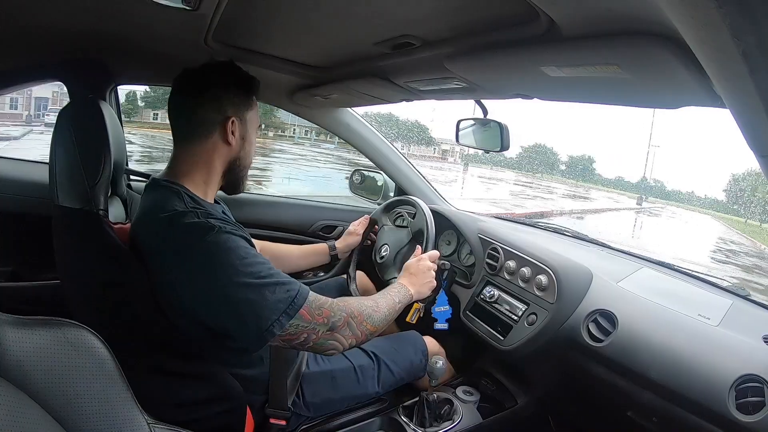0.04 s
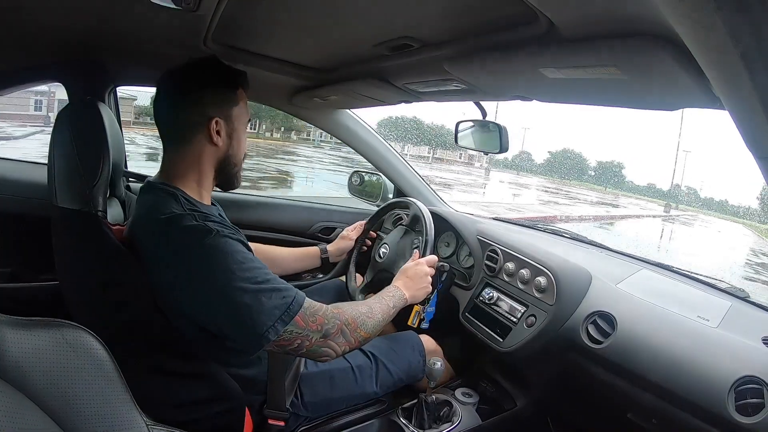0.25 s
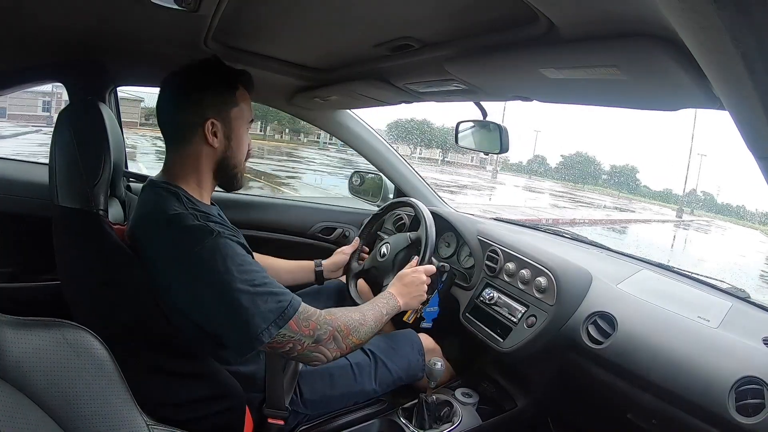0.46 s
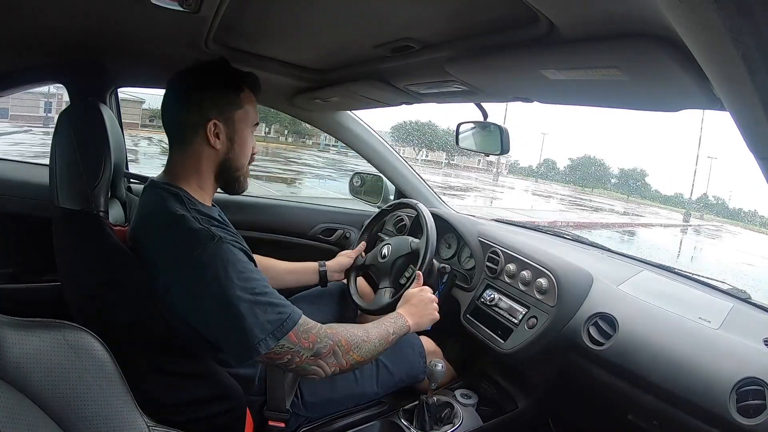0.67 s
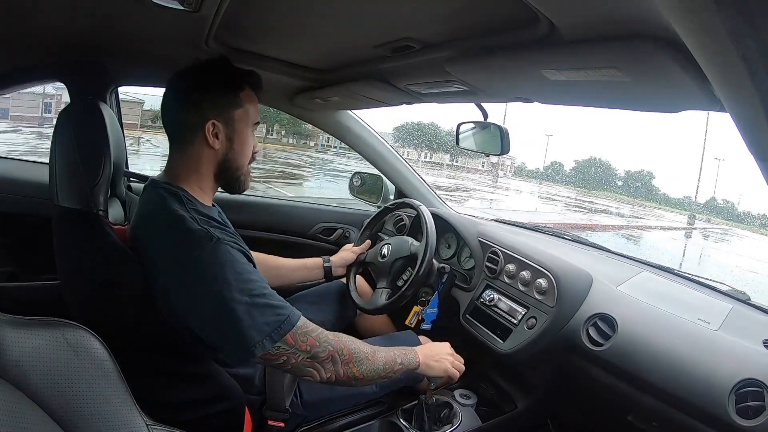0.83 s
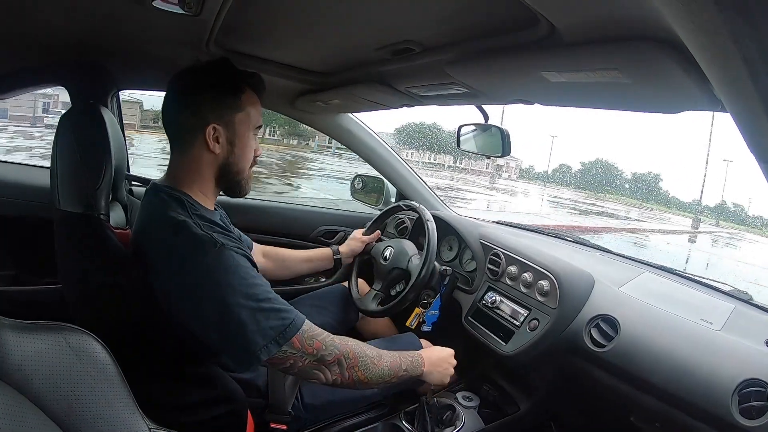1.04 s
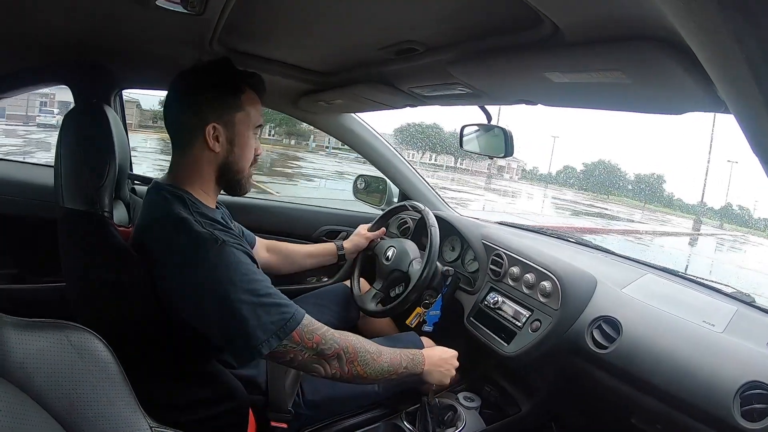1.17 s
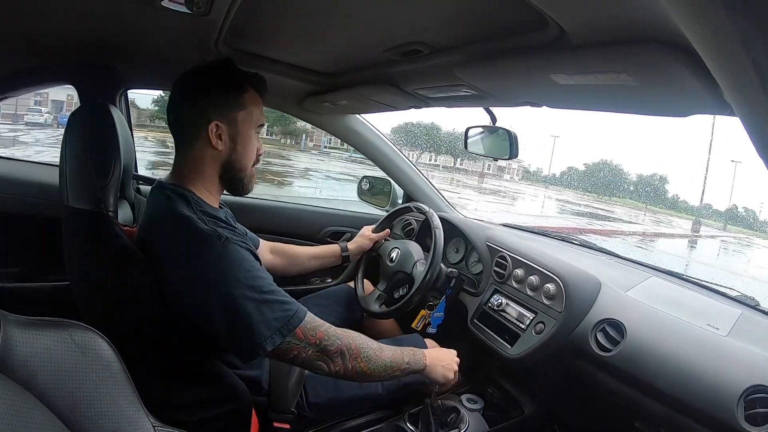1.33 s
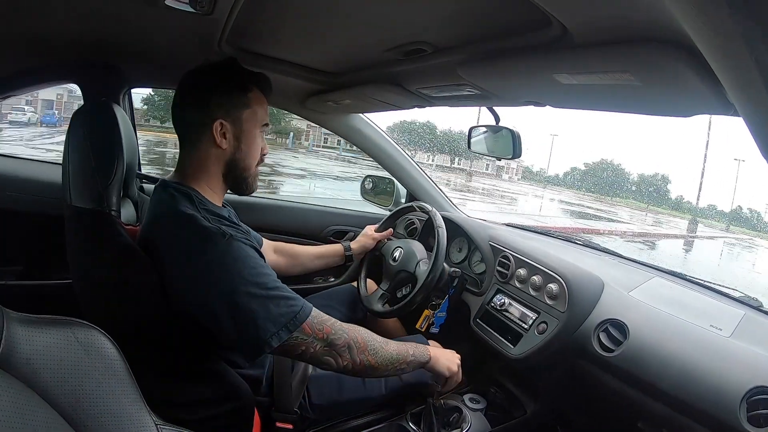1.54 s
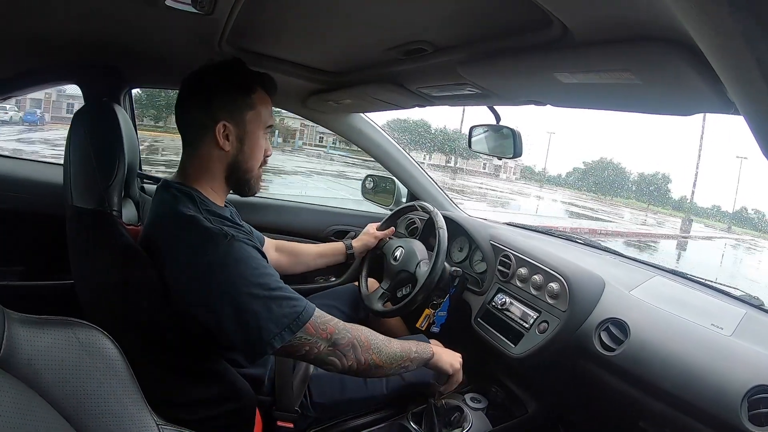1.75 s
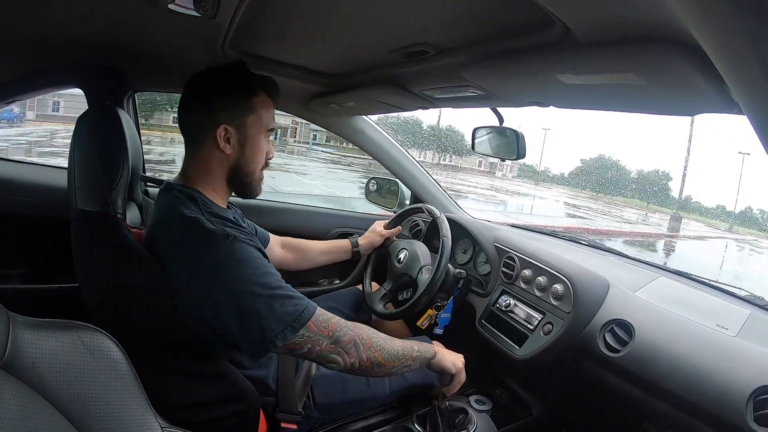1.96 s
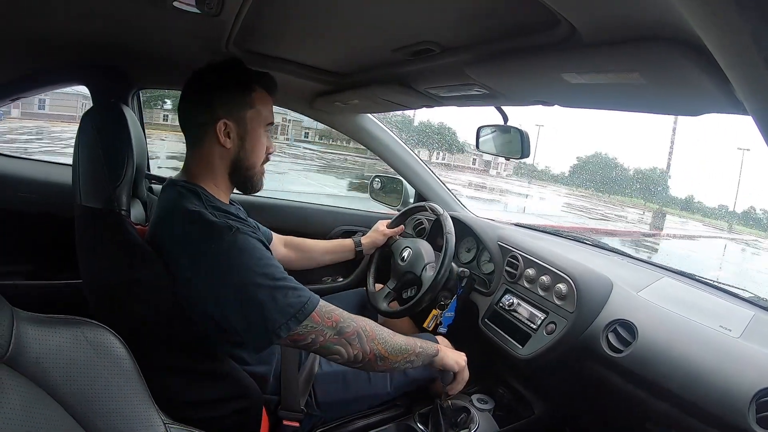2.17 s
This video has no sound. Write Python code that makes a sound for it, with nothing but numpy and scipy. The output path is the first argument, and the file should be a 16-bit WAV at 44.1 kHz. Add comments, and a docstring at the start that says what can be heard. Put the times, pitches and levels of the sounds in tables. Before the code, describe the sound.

Car engine accelerating from a low drone to a loud, raspy howl inside a rumbling cabin.

```python
"""A wide low thud under the slightly fainter car opens the scene and ends at once in the click of an edit.
Then a car pulls hard in a low gear on a wet road, heard from beside the passenger seat. Sine waves at the
firing rate and shaft multiples of its four-cylinder engine sweep through the peaks and holes of the cabin;
the valve timing changes on the way up and the throttle eases at the end. Filtered noise makes road rumble,
cabin drone, engine clatter, spray in the wheel arches and a few ticks."""
import sys
import numpy as np
from scipy import signal
from scipy.fft import rfft, irfft
from scipy.io import wavfile
from scipy.ndimage import uniform_filter1d

SR = 44100
rng = np.random.default_rng(int(sys.argv[2]) if len(sys.argv) > 2 else 0)


def materialize(psi):
    """Save the field psi as 16-bit PCM at rate SR to the path in sys.argv[1].

    A 1-D psi becomes a single channel; in a 2-D psi each row is a channel.
    """
    bounded = np.clip(np.atleast_2d(psi).T, -1, 1)
    quanta = np.round(bounded * 32767).astype(np.int16)
    wavfile.write(sys.argv[1], SR, quanta)


def amplitude_ratio(level_db):
    """Convert a level in decibels to the matching linear amplitude (field) ratio."""
    exponent = np.asarray(level_db, float) / 20
    return 10 ** exponent


N = 97108  # samples

# Engine speed. Each row: time in seconds, firings per second in Hz.
FIRING_RATE = [(0.0, 108.0), (0.14, 113.9), (0.28, 118.4), (0.42, 126.3), (0.56, 134.6), (0.7, 143.9),
               (0.84, 152), (0.98, 162.8), (1.12, 172.5), (1.26, 183.8), (1.4, 192), (1.54, 205.3),
               (1.68, 216.3), (1.82, 230.7), (1.96, 241.1), (2.1, 251.6), (2.2, 255.2)]
# Firing tone through exhaust and cabin. Each row: firing rate in Hz, mid rms in dB, side rms in dB.
FIRING_RESPONSE = [(110.6, -18, -47), (114, -19, -48), (117, -21, -52), (121, -22, -55), (124.3, -25, -50),
                   (127.6, -19, -47), (130.9, -15, -48), (135.5, -14, -54), (140.7, -17, -43),
                   (142.6, -23, -39), (145.8, -15, -35), (149.5, -12, -34), (160.6, -11, -36),
                   (168, -13, -33), (170.9, -20, -31), (173, -38, -29), (175.1, -28, -28), (178, -18, -27),
                   (182.3, -11, -29), (187.4, -9, -31), (197.6, -11, -35), (201.9, -14, -39),
                   (210.6, -18, -45), (216.6, -22, -58), (220.5, -27, -51), (224.3, -21, -52),
                   (229.4, -14, -42), (233.4, -15, -40), (236.7, -11, -33), (242.3, -11.5, -32),
                   (247.8, -15, -37), (251, -13, -32), (254.7, -16, -32), (257.6, -19, -35)]
# Other multiples of the firing rate, before the cabin response.
# Each row: multiple, level in dB with mild cam, level in dB with sharp cam.
MULTIPLES = [(0.5, -45.5, -33), (0.75, -36, -24), (1.25, -39.5, -32.5), (1.5, -45, -34.5),
             (1.75, -47.5, -40.5), (2.0, -32.5, -31), (2.25, -47.5, -42), (2.5, -45, -43.5),
             (2.75, -48.0, -42.5), (3.0, -48.5, -45), (3.25, -49.5, -48), (3.5, -52.5, -53.5),
             (3.75, -49.5, -51.5), (4.0, -50, -51), (4.25, -56.5, -50.5), (4.5, -60.5, -51.5)]
# Change of each of those multiples, in the same order, while the revs are low. Each entry: change in dB.
LOW_REV_DB = [4, 6, 2.5, 0.5, 2, -7, 4, -3.5, -1.5, 1.5, -3.5, -5, -4, -5, 2.5, -2]
# Body and cabin response for the multiples. Each row: frequency in Hz, mid gain in dB, side gain in dB.
CABIN_RESPONSE = [(60.3, -8.5, -21.5), (97, -1.5, -17), (111, -1.5, -23), (137, 4, -21.5), (166, -8.5, -39),
                  (159, 4, -23.5), (168.8, -4, -21), (181.2, 3.5, -21), (186.9, 3, -16), (192.9, -0.5, -20),
                  (238.3, -3, -24.5), (240.0, -11.5, -26), (256.8, 5.5, -17), (290, -0.5, -18.5),
                  (310.4, -0.5, -20), (327.7, 13, -11.5), (330.7, 10, -16.5), (373, 3, -8), (381, 8.5, -16),
                  (415, 4, -20), (436, -1, -10.5), (480, -4, -14), (504.6, 0.5, -12), (550.4, 7.5, -0.5),
                  (559, -2, -3.5), (670, -6.5, -6), (650, 6, -1), (660, 0.5, -5.5), (708, -1, -4),
                  (753, 0.5, 1.5), (802, -9.5, 3.5), (840, 4, 2.5), (930, 5, -0.5), (1025, -7.5, -1),
                  (1100.0, 4.5, -5), (1140, 2.5, -11.5), (1330, -7.5, -9), (1450, 0.5, 2),
                  (1580, -8.5, -9.5), (2100, -7, -6.5)]
# A multiple swells, or dips where negative, briefly around a given time.
# Each row: time in seconds, multiple of firing rate, rise in dB, time to 1/e of that rise in seconds.
MULTIPLE_SWELLS = [(0.52, 3.0, 10.5, 0.1), (0.55, 2.5, 7.5, 0.072), (0.684, 1.5, 20, 0.067),
                   (0.72, 6.0, 10, .07), (0.84, 1.25, 14.5, 0.13), (0.53, 2.0, 3, 0.097),
                   (0.84, 5.75, 8, .05), (0.88, 1.75, 13.5, 0.17), (0.86, 2.25, 8.5, 0.047),
                   (1.1, 2.75, 8.5, 0.057), (1.11, 3.0, 15, 0.042), (1.47, 2.75, 9, 0.15),
                   (1.52, 3.75, 14, 0.038), (1.56, 4.25, 5.5, 0.048), (1.555, 1.5, 12, 0.054),
                   (2.3, 3.0, 8, .13), (2.06, .75, 5.5, 0.079), (1.03, 4.0, 4.5, 0.21),
                   (1.97, 2.0, 6, 0.07), (1.65, 1.25, -7.5, 0.09), (2.11, 1.5, -15.5, 0.038),
                   (2.09, 2.0, -9, 0.038)]
# Noise spectra. Each row: frequency in Hz, relative mid density in dB per Hz, relative side density likewise.
RUMBLE_COLOUR = [(15.7, -11, -14.5), (28, 0, -15.5), (47.4, -6.5, -23.5), (71, -14.5, -23),
                 (94, -6.5, -21.5), (108, -22, -39.5)]
DRONE_COLOUR = [(80, -6, -24), (110, -1, -20), (200, -5, -24), (350, -7, -23), (520, -13, -19),
                (800, -26, -28)]
CLATTER_COLOUR = [(289, -4.5, -23.5), (610, -8, -9.5), (750, -3, -1.5), (850, -9, -8.5), (920, -4.5, -4.5),
                  (1200, -6.5, -10.5), (1400, -9.5, -8), (1520, -11.5, -14.5), (2160, -11.5, -16.5),
                  (2870, -21, -21), (3700, -24, -28), (4150, -28, -32.5), (6240, -32.5, -30),
                  (7500, -44, -44.5), (10500, -55.5, -52), (11500, -66.5, -71), (15000, -76, -79.5)]
SPRAY_COLOUR = [(2520, -8, -19.5), (4200, -6.5, -10), (4995, -0.5, -1.5), (6800, 0.5, -3), (7600, -8, -5.5),
                (10000, -9, -11.5), (11500, -24.5, -22.5), (14000, -36, -43.5)]
# Road surface under the wheels. Each row: time in seconds, rumble level in dB.
SURFACE_LEVEL = [(0.06, -32), (0.2, -28), (0.25, -33), (0.31, -23.5), (0.57, -25), (0.67, -22.5),
                 (0.83, -33), (0.91, -31), (0.96, -39), (1.01, -18), (1.1, -27.5), (1.16, -23.5),
                 (1.29, -28), (2.18, -24)]
# Treble noise. Each row: time in seconds, clatter level in dB, spray level in dB.
TREBLE_LEVEL = [(0, -45.5, -55), (.2, -46, -53), (.35, -44.5, -56.5), (.47, -41, -61.5),
                (.56, -42.5, -60.5), (.7, -42.5, -65), (.95, -43, -64.5), (1.15, -44.5, -68),
                (1.3, -43.5, -63.5), (1.5, -42.5, -71.5), (1.7, -40.5, -69.5), (1.9, -39, -65),
                (2.2, -37.5, -58)]
# Small things in the cabin. Each row: start in seconds, white-noise level in dB before band filter and envelope,
# decay time in seconds, left minus right in dB.
TICKS = [(.26, -49, .015, -9), (0.999, -35, 0.0088, -4), (1.017, -48, 0.009, -4.5), (1.377, -56, .004, -2)]

EDIT_S = .0386


def column(table, at, k):
    """Linear interpolation: column k of a table, slewed by a 20 ms moving mean so that nothing jumps."""
    rows = np.array(sorted(table), float)
    return uniform_filter1d(np.interp(at, rows[:, 0], rows[:, k]), int(.02 * SR))


def walk(rate):
    """Band-limited fluctuation: random levels held 1 / rate s and smoothed twice, rms about 0.8."""
    hold = int(SR / rate)
    steps = np.repeat(rng.standard_normal(N // 100), hold)[:N]
    return 1.1 * uniform_filter1d(uniform_filter1d(steps, hold), hold)


def fade(t, centre_s, length_s):
    """Linear transition: 0 to 1 over length_s about its centre."""
    return np.clip((t - centre_s) / length_s + .5, 0, 1)


def noise(colour, swell_db, flicker_db, rate):
    """Spectral shaping: mid and side noise, mid rms near 1, in bands that swell together and flicker alone.

    Both depths multiply walks.
    """
    rows = np.array(colour, float)
    hz = np.maximum(np.arange(N // 2 + 1) * SR / N, 1)
    log_hz, log_rows = np.log(hz), np.log(rows[:, 0])
    gain = amplitude_ratio([np.interp(log_hz, log_rows, rows[:, k], left=-99, right=-99) for k in (1, 2)])
    spectrum = rfft(rng.standard_normal((2, N))) * gain
    place = 2 * np.log2(hz / rows[0, 0])  # in half octaves
    swell, out = walk(3.7), 0
    for band in range(int(2 * np.log2(rows[-1, 0] / rows[0, 0])) + 2):
        share = np.clip(1 - abs(place - band), 0, 1)  # neighbouring bands overlap and sum to one
        out = out + irfft(spectrum * share, N) * amplitude_ratio(swell_db * swell + flicker_db * walk(rate))
    return out / np.sqrt(np.mean(gain[0] ** 2))


def panned(x, pan_db):
    """Interaural level difference: left minus right in dB, split evenly between the two."""
    return x * amplitude_ratio(np.array([[pan_db], [-pan_db]]) / 2)


def left_right(mid_side):
    """Sum and difference: left is mid plus side, right is mid minus side."""
    return np.array([[1, 1], [1, -1]]) @ mid_side


def opening_thud(t):
    """Interchannel phase difference: one low sine, out of step between left and right, sounds wide."""
    return amplitude_ratio(-20) * np.sin(2 * np.pi * 65.5 * t + np.array([[2.5], [4.0]]))


def firing_tone(hz, phase):
    """Resonance: a sine at the firing rate rises and falls with the exhaust and cabin response."""
    mid = amplitude_ratio(column(FIRING_RESPONSE, hz, 1)) * np.sin(phase)
    side = amplitude_ratio(column(FIRING_RESPONSE, hz, 2)) * np.cos(phase)
    waver = amplitude_ratio(.4 * walk(20))
    return np.sqrt(2) * waver * np.array([mid, side])  # sqrt(2): from rms to peak


def multiple_rows():
    """Harmonic roll-off: the listed multiples, then upper ones a quarter apart that fall off evenly.

    Each row: multiple, level in dB with mild cam, with sharp cam, low-rev change in dB.
    """
    rows = [(*row, low_db) for row, low_db in zip(MULTIPLES, LOW_REV_DB)]
    for above in np.arange(22) / 4:
        slope_db = -2.01 * above
        rows.append((4.75 + above, -55.5 + slope_db, -54.5 + slope_db, -5))
    return rows


def multiple_swell_db(t, multiple):
    """Gaussian envelope: a bell-shaped rise or dip in dB of one multiple around each given time."""
    return sum(rise_db * np.exp(-((t - at) / half) ** 2)
               for at, m, rise_db, half in MULTIPLE_SWELLS if abs(m - multiple) < 1 / 8)


def shaft_multiples(t, hz, phase):
    """Order series: partials locked to the shaft, each filtered by the cabin and wavering on its own."""
    sharp_cam = fade(t, 1.46, .013)  # the valve timing changes
    low_revs = 1 - fade(t, .59, .1)
    out = np.zeros((2, N))
    for multiple, mild_db, sharp_db, low_db in multiple_rows():
        turn = multiple * (phase + .075 * walk(12))  # walk scaled in radians per multiple
        level_db = mild_db + sharp_cam * (sharp_db - mild_db) + low_revs * low_db
        level_db = level_db + multiple_swell_db(t, multiple)
        waver_db = min(1.2 + .8 * multiple, 4.5)
        for k in (1, 2):  # mid, side
            # the cap on the walk lets a multiple dip far but rise little
            waver = waver_db * np.minimum(walk(14), .6)
            db = level_db + column(CABIN_RESPONSE, multiple * hz, k) + waver
            out[k - 1] += amplitude_ratio(db) * np.sin(turn + 2 * np.pi * rng.random())
    return np.sqrt(2) * out  # from rms to peak


def engine(t, hz, phase):
    """Superposition: firing tone plus multiples, which fade twice as many dB as the throttle eases."""
    lift_db = -4 * fade(t, 2.17, .055)
    return amplitude_ratio(lift_db / 2) * firing_tone(hz, phase) + amplitude_ratio(lift_db) * shaft_multiples(t, hz, phase)


def road_rumble(t):
    """Random excitation: low noise from the road whose level follows the surface under the wheels."""
    return amplitude_ratio(column(SURFACE_LEVEL, t, 1)) * noise(RUMBLE_COLOUR, .33, 2.5, 9)


def cabin_drone():
    """Diffuse background: steady low noise of the cabin with a slight flicker."""
    return amplitude_ratio(-35) * noise(DRONE_COLOUR, .06, 1.5, 16)


def engine_clatter(t, phase):
    """Amplitude modulation: noise pulsing at the firing rate and at a quarter of it."""
    gate = 1 + .097 * np.cos(phase / 4) + .097 * np.cos(phase)
    return amplitude_ratio(column(TREBLE_LEVEL, t, 1)) * gate * noise(CLATTER_COLOUR, .39, 2, 12)


def wheel_spray(t):
    """Broadband turbulence: water in the wheel arches as bright, quickly flickering noise."""
    return amplitude_ratio(column(TREBLE_LEVEL, t, 2)) * noise(SPRAY_COLOUR, .34, 1.3, 25)


def edit_click(t):
    """Step discontinuity: the signal jumps at the edit and decays back within milliseconds."""
    decay = np.exp(-np.maximum(t - EDIT_S, 0) / .0012)
    return panned((t >= EDIT_S) * amplitude_ratio(-11.5) * decay, 3)


def ticks(t):
    """Transient excitation: band-passed noise with a quick rise and exponential decay."""
    sos = signal.butter(3, (3200, 7800), "band", fs=SR, output="sos")
    out = 0
    for at, db, decay_s, pan_db in TICKS:
        shape = np.clip((t - at) / .0021, 0, 1) * np.exp(-np.maximum(t - at, 0) / decay_s)
        rustle = signal.sosfilt(sos, rng.standard_normal((2, N)))
        out = out + panned(amplitude_ratio(db) * shape * rustle, pan_db)
    return out


def scene():
    """Superposition: engine, road and cabin add, with the treble noise leaning right."""
    t = np.arange(N) / SR
    hz = column(FIRING_RATE, t, 1)
    phase = 2 * np.pi * np.cumsum(hz) / SR
    low = engine(t, hz, phase) + road_rumble(t) + cabin_drone()
    treble = engine_clatter(t, phase) + wheel_spray(t)
    return left_right(low) + panned(left_right(treble), -2.5) + ticks(t)


def low_pass(x):
    """Removes everything above the highest recorded frequency."""
    return signal.sosfilt(signal.butter(12, 15700, fs=SR, output="sos"), x)


def record(dry):
    """Splice: before the edit the scene is 1.5 dB fainter under the thud, at the edit it clicks."""
    t = np.arange(N) / SR
    spliced = np.where(t < EDIT_S, amplitude_ratio(-1.5) * dry + opening_thud(t), dry)
    mix = spliced + edit_click(t)
    return low_pass(mix)


dry = scene()
out = record(dry)
materialize(out)
```